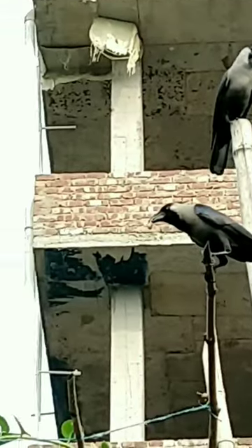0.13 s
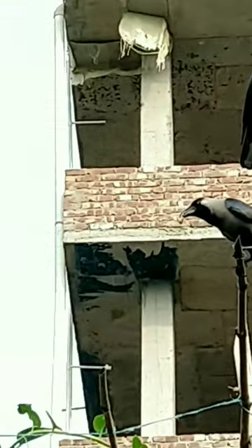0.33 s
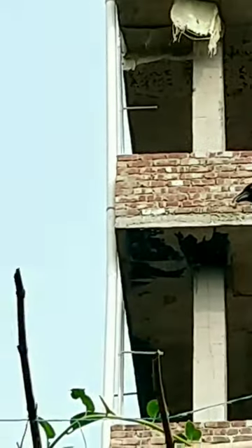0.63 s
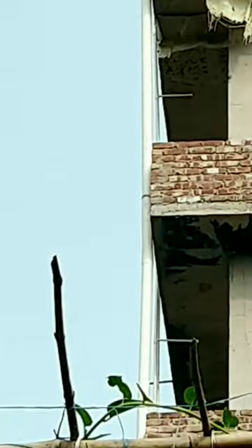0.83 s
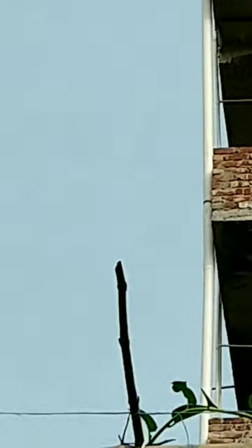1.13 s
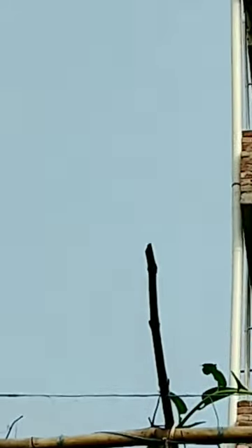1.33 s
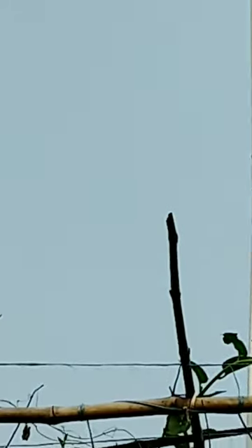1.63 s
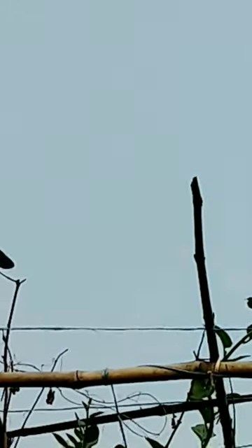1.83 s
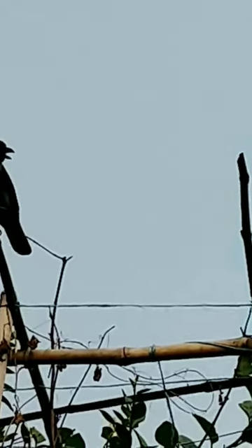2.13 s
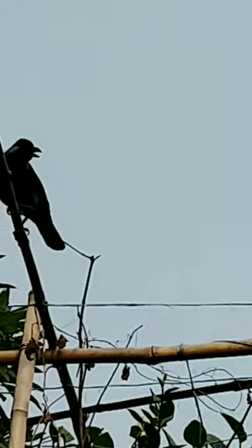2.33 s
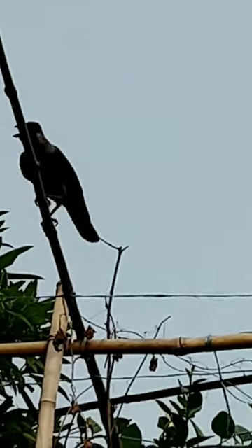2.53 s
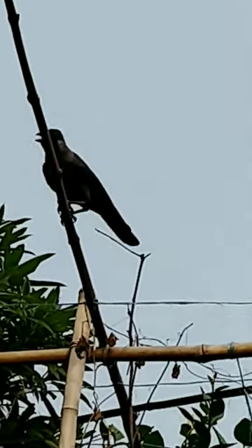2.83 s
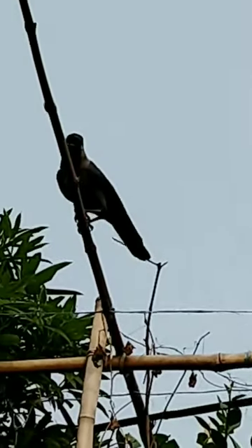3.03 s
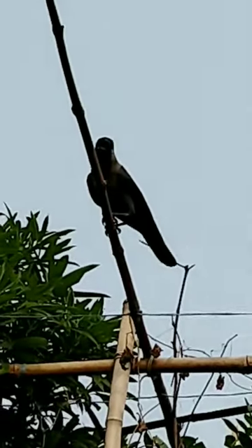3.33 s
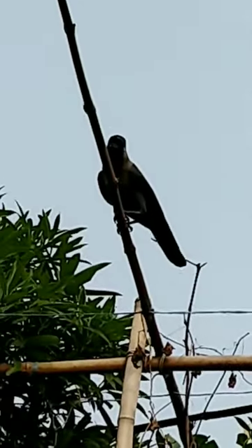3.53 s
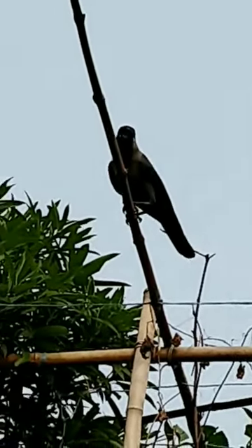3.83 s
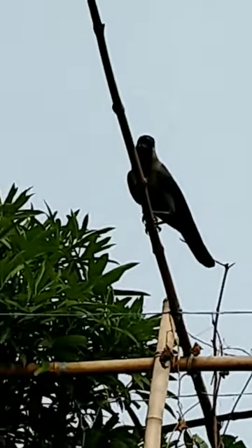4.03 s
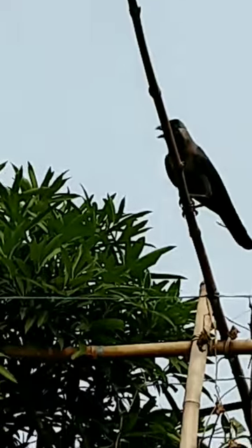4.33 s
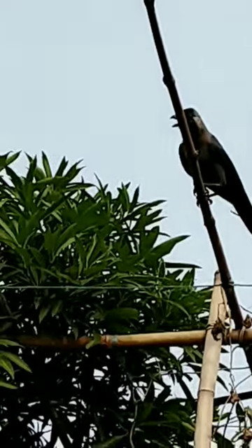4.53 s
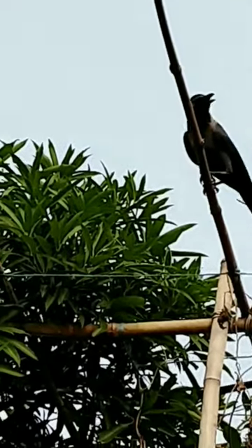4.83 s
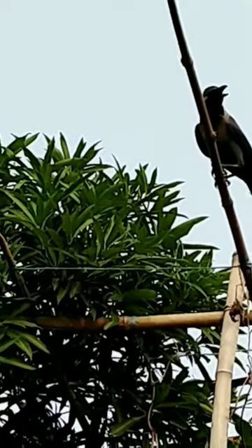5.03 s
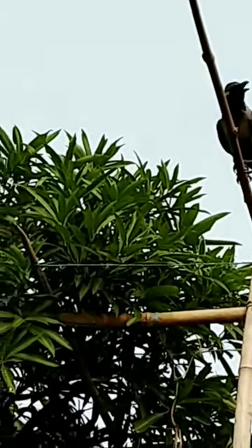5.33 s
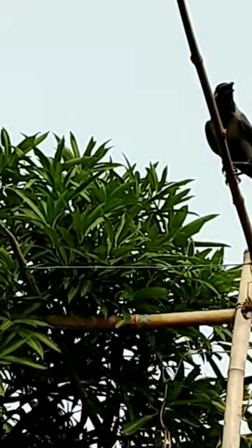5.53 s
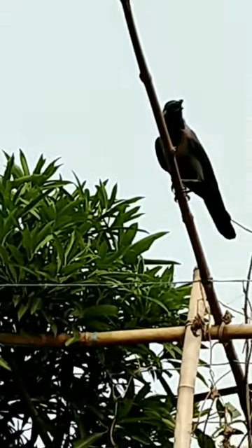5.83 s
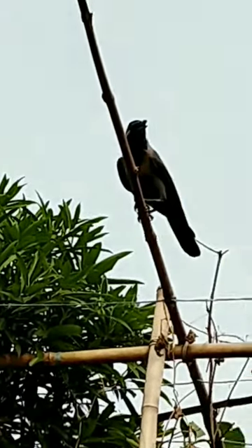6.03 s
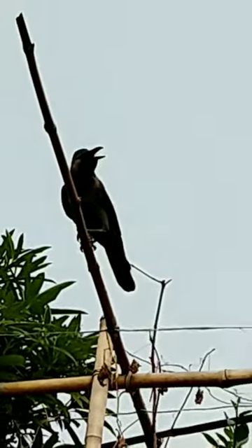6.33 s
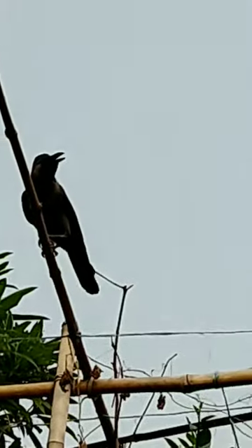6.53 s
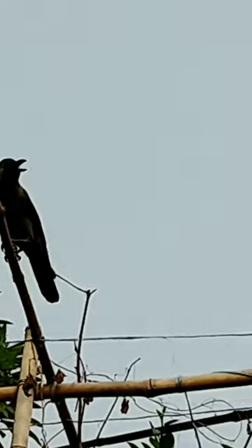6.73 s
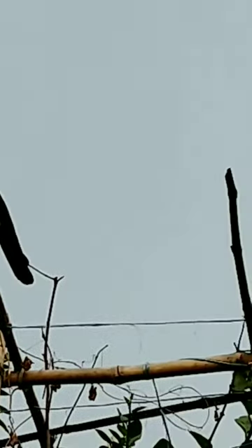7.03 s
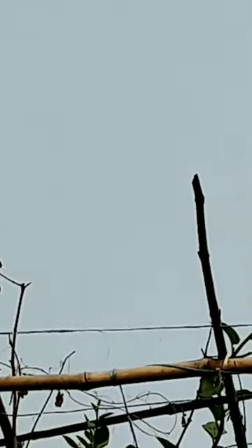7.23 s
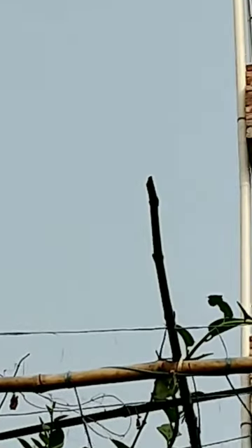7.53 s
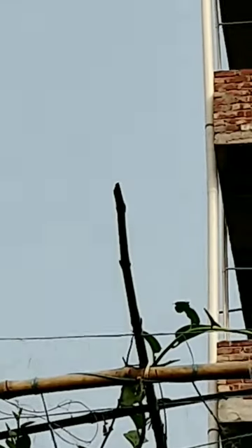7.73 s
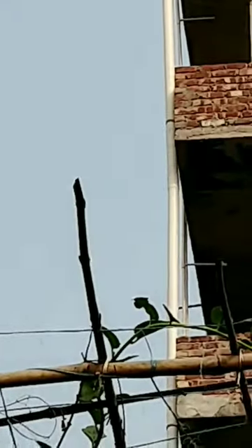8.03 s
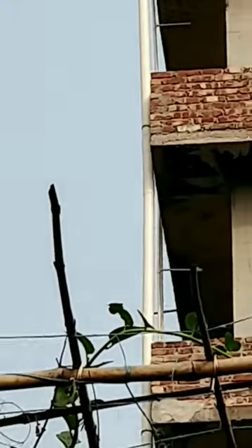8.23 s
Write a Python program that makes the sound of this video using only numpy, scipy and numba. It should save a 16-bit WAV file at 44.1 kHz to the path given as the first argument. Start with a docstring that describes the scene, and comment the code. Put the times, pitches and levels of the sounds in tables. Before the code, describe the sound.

A low, steady town murmur with faint hiss opens the scene, its upper part filling in over the first second. A barely audible caw at 0.2 s and small distant sparrow notes and faint whistles lead to 1.4 s, when a near crow begins: five hoarse, nasal caws, each about 0.3 s, at 1.4, 1.9, 2.5, 3.0 and 3.6 s. A sparrow chirps at 1.85 s, and broom-like swishes brush past around 2.3, 3.6 and 4.2 s. A weaker caw comes at 4.4 s, a chirp at 4.9 s, then from 5.0 to 7.4 s caws of uneven strength overlap, with another swish near 6 s and traffic swelling softly around 7.3 s. Strong caws at 7.6 and 8.1 s close it. The calls lean slightly left, with dense short echoes and a bright tail from concrete.

```python
"""A far town murmur, a faint caw and far sparrow notes come first; then a near house crow caws in two runs, others between.
The crows sit on bamboo poles by a bare concrete building: fluttering pulse tones ring through a throat, with breath noise.
Sparrows chirp in bending near sines, and strokes of broad noise swish now and then like a broom.
Walls throw the near sounds back as dense echoes; shaped noise makes the town's rumble and hiss, heard on two microphones."""
import sys
import numpy as np
from scipy import signal
from scipy.fft import rfft, irfft, next_fast_len
from scipy.io import wavfile
from scipy.ndimage import uniform_filter1d
from numba import njit

SR = 44100
rng = np.random.default_rng(int(sys.argv[2]) if len(sys.argv) > 2 else 0)


def unload_audio(sound):
    """Save the sound as a 16-bit wav file, at the path given as the first command line argument."""
    columns = np.transpose(np.atleast_2d(sound))
    # keep every value between -1 and 1, then stretch to whole-number steps
    steps = np.round(np.clip(columns, -1, 1) * 32767)
    wavfile.write(sys.argv[1], SR, steps.astype(np.int16))


N = 369558

# All levels are before the final mix; spectra give only colour, as their noise is scaled to rms 1.
# Crow caws: start_s, length_s, level_db, top_moment [0-1], top_pitch_hz, end_sag_hz, mean_flutter_hz,
# whole_share [tone left whole by the flutter, 0-1], breath_db [over the tone], left_right_db
CAWS = [(0.189, 0.3, -53, 0.5, 967, 207, 70.7, 0.14, -0.5, 3),
        (1.396, 0.29, -27, 0.47, 940, 385, 71.9, 0.07, -6, 2.5),
        (1.935, 0.28, -27, 0.53, 938, 448, 71, 0.1, -5.5, 3.5),
        (2.478, 0.3, -27, 0.49, 942.7, 407, 70.7, 0.13, -8, 3.5),
        (3.035, 0.29, -26, 0.41, 964, 467, 73.26, 0.08, -6.5, 1.5),
        (3.593, 0.31, -25.5, 0.45, 961, 399, 71.5, 0.15, -8.5, 2.5),
        (4.386, 0.32, -32.5, 0.38, 968.5, 350, 69.76, 0.07, -5.5, 0.5),
        (5.041, 0.37, -28, 0.36, 948, 276, 72.64, 0.05, -4, 2.5),
        (5.42, 0.32, -30, 0.29, 978, 209, 71.7, 0.5, -10, 0),
        (5.58, 0.31, -29, 0.43, 940, 310, 72.1, 0.08, -7, 2),
        (5.807, 0.27, -33, 0.19, 973, 248, 69.9, 0.23, -7.5, 1),
        (6.033, 0.25, -32.5, 0.25, 1002, 216, 71.3, 0.22, -19, 0.5),
        (6.144, 0.3, -31, 0.31, 966, 456, 71.3, 0.08, -5, 2),
        (6.413, 0.33, -32.5, 0.24, 956, 299.4, 71.2, 0.18, -8.5, 2.5),
        (6.638, .28, -29, 0.4, 973.5, 319, 71.7, 0.1, -5.5, 3.5),
        (6.844, 0.27, -34.5, 0.28, 988, 243, 71.2, 0.23, -11, 0),
        (7.071, 0.25, -31.5, 0.28, 943, 150, 71.1, 0.1, -7, 3),
        (7.157, 0.28, -27, 0.45, 962.5, 390, 72.8, 0.02, -7.5, 4),
        (7.616, 0.29, -25.5, 0.33, 987, 392, 71.2, 0.14, -7, 3.5),
        (7.933, 0.28, -54, 0.3, 1037, 140, 71, 0.4, -11, 4),
        (8.074, .3, -25, 0.45, 986, 401, 71.8, 0.05, -6.5, 4.5)]
# Resonances of the crow's throat: centre_hz [at the top pitch], width_hz [of each of two passes], relative_level_db
THROAT_RINGS = [(730, 1100, -16), (1195, 467, -4.5), (1496, 950, -5.5), (1921, 290, 9.5), (2090, 376, -1),
                (2556, 76, -10.5)]
# Colour of the crow's breath: frequency_hz, relative_db_per_hz
BREATH_COLOUR = [(1590, -50), (2700, -42), (2980, -8.5), (3710, -10), (4580, 0.5), (5530, -2.5), (6880, -8),
                 (9850, 5), (12300, -9), (14000, -19.5), (14700, -36)]
# Near sparrow notes: start_s, length_s, level_db, first_pitch_hz, middle_pitch_hz, last_pitch_hz
CHIRPS = [(1.836, .036, -52, 4700, 5400, 6200), (1.862, .095, -40, 3100, 4750, 3700),
          (4.868, .04, -49, 3800, 4500, 5600), (4.9, .125, -41, 2650, 4550, 3600)]
# Notes of farther sparrows, heard mostly off the walls: same columns as CHIRPS
FAR_CHIRPS = [(-.02, 0.085, -55.5, 5130, 4760, 4070), (.32, 0.03, -54.5, 4320, 4770, 4580),
              (.62, 0.17, -62, 5750, 5280, 5220), (.755, 0.11, -53, 3220, 4670, 3770),
              (1.055, 0.088, -65, 5400, 5800, 7000), (1.145, 0.055, -50, 7060, 4870, 3360),
              (4.35, 0.058, -45.5, 3380, 4610, 4720)]
# Faint far whistles: same columns as CHIRPS
WHISTLES = [(-.1, 0.39, -60, 2550, 2524, 2660), (.5, 0.75, -55.5, 1220, 1110, 1060),
            (.95, 0.265, -60.5, 1110, 1065, 1050), (1.03, 0.35, -56, 940, 944, 934)]
# Short low hums far off: same columns as CHIRPS
HUMS = [(.88, 0.13, -47.5, 431, 440, 440), (1.05, 0.17, -46, 339, 340, 334),
        (2.36, 0.1, -47.5, 368, 345, 335), (3.44, 0.12, -42.5, 289, 325, 417),
        (7.3, 0.29, -53, 381, 385, 393), (7.36, 0.32, -50, 288.3, 292, 293.5),
        (7.3, 0.31, -66, 193, 200, 196)]
# Broom-like swishes: start_s, length_s, level_db
SWISHES = [(.2, 0.56, -81), (2.19, 0.36, -39.5), (2.75, 0.38, -49), (3.39, 0.78, -47.5),
           (4.05, 0.38, -39.5), (5.91, 0.41, -38.5), (7.88, 0.19, -56.5)]
# Colour of a swish: frequency_hz, relative_db_per_hz
SWISH_COLOUR = [(290, -38), (500, -8.5), (774, -4.5), (1800, -2.5), (3970, -12), (7500, -13.5), (9800, -10),
                (11500, -12), (13500, -24), (14700, -40)]
# Swells of traffic rumble: start_s, length_s, level_db
SWELLS = [(.85, 0.48, -79.5), (2.29, 0.27, -49), (3.4, 0.32, -61), (4.5, 2, -56), (6.85, 1.06, -46.5)]
# Colour of the traffic rumble: frequency_hz, relative_db_per_hz
TRAFFIC_COLOUR = [(47, -60), (80, -6.5), (275, -3), (324, -12.5), (374, -2.5), (421, -10.5), (700, -14.5),
                  (910, -5), (1540, -120)]
# Colour of the steady town murmur: frequency_hz, relative_db_per_hz
TOWN_COLOUR = [(12, -52), (20, -27.5), (97, 2), (230, 1.5), (374, 0), (596, -3.5), (910, -5), (1510, -8.5),
               (1810, -7.5), (2080, -13.5), (2260, -38), (2500, -32), (3250, -51), (5500, -120)]
# Colour of the far hiss: frequency_hz, relative_db_per_hz
AIR_COLOUR = [(1470, -47), (2500, -42), (4250, -35), (5450, -5), (6220, -13), (8480, -3), (9820, 19),
              (10800, 4.5), (11800, 9), (14500, -53)]
# Likeness of noise at the two microphones: frequency_hz, likeness [-1 to 1]
LIKENESS = [(30, .55), (100, .93), (300, .9), (700, .3), (2000, .3), (3500, -.2), (6000, -.5),
            (12000, -.55)]
# Left-right balance of noise: frequency_hz, left_right_db
LEAN = [(30, -1.5), (200, -1.5), (700, -1.5), (2000, 3), (5000, -2.5), (12000, 0)]

# Caw: sets in fast, swells a little, dies
CAW_LOUDEST, CAW_RISE_DB, CAW_RISE_STEEP, CAW_FALL_DB, CAW_FALL_STEEP = .6, 27, 4, 27, 2.5
START_SAG_HZ = 200.44  # the pitch starts this far under its top
RING_FOLLOWS = 0.17  # share of the pitch's sag that the throat's rings follow
LOUD_DB, LOW_DB, LOW_PER_DB = -27, 0.5, 0.49  # low rings' gain in a caw at LOUD_DB; more per dB fainter
OVERTONES_DB, OVERTONE_TILT_DB = -20.5, 0.5  # partials added past the throat; change per partial
RING_LEAN_DB = 4  # the left microphone favours the throat's main ring
# Note: swells and dies; its bend comes a little early and peaks
NOTE_TOP, NOTE_RISE_DB, NOTE_FALL_DB, NOTE_FADE_S = .42, 13, 14, .01
NOTE_HURRY, NOTE_PEAKED = .9, 1.5  # exponents
SWISH_TOP, SWISH_RISE_DB, SWISH_FALL_DB = 0.35, 13, 13.5
SWELL_END_DB = 16  # fall from a swell's top to either end
TRAFFIC_DB, TRAFFIC_DB_PER_S = -62.5, 1.18  # the rumble under the swells grows slowly
TOWN_DB, AIR_DB = -51, -57
TOWN_DIP_DB, TOWN_DIP_S, TOWN_SPLIT_HZ = 10.5, 1, 470  # the upper murmur starts low and fills in
CUTOFF_HZ = 15000


def crows(half_db, swing):
    """Syrinx pulses, strong and weak in turn, shaken by a slow flutter, through the throat; breath hisses along."""
    wander_hz, rough_db, grit, pitch_steep, fade_s = 8, -2.5, .4, 2.8, .015
    slip = .6  # radians by which the flutter's turns slip about
    lag = 3  # samples
    tone, breath, hoarse = np.zeros((2, N)), np.zeros(N), drift(111)
    wander, unsteady, rasp = drift(48.2), drift(6.1), rng.standard_normal(N)
    for (start_s, length_s, level_db, top, top_hz, fall_hz,
         flutter_hz, whole, breath_db, pan_db) in CAWS:
        at, along, fade = span(start_s, length_s, fade_s)
        rise_db = arch(along, CAW_LOUDEST, CAW_RISE_DB, 0, CAW_RISE_STEEP)
        fall_db = arch(along, CAW_LOUDEST, 0, CAW_FALL_DB, CAW_FALL_STEEP)
        gain = fade * amp(level_db + rise_db + fall_db)
        hz = top_hz + arch(along, top, START_SAG_HZ, fall_hz, pitch_steep)
        flutter = 2 * np.pi * np.cumsum(flutter_hz * (1 + 0.023 * unsteady[at])) / SR

        # the flutter bends the pitch and turns the upper tone over twice a turn:
        # the upper partials split into lines a flutter apart
        phase = 2 * np.pi * np.cumsum(hz + wander_hz * wander[at]) / SR + swing * np.sin(flutter)
        upper = sum(np.cos((k + 1) * phase) + amp(half_db) * np.cos((k + .5) * phase) for k in (1, 2))
        lowest = np.cos(phase) * (1 + 1.36 * np.sin(flutter) + grit * hoarse[at])
        turning = whole + np.cos(flutter + slip * wander[at])
        source = lowest + upper * turning + amp(rough_db) * rasp[at]

        sink = 1 + RING_FOLLOWS * (hz / top_hz - 1)  # the beak closes as the pitch sags
        rings = [(-1) ** k * amp(ring_db) * resonance(source, ring_hz * sink, width_hz)
                 for k, (ring_hz, width_hz, ring_db) in enumerate(THROAT_RINGS)]
        fainter_db = np.clip(LOUD_DB - level_db, -3, 9)
        low = amp(LOW_DB + LOW_PER_DB * fainter_db) * sum(rings[:2])
        high = sum(rings[2:])
        # the high rings' own swings are evened out before the caw's swell is laid on
        even = gain / np.sqrt(uniform_filter1d(high ** 2, size=2600, mode="reflect") + 0.0027)
        # only the short waves are shadowed on the far side
        ring_lean = amp([[RING_LEAN_DB / 2], [-RING_LEAN_DB / 2]]) - 1
        pan = amp([[pan_db / 2], [-pan_db / 2]])
        tone[:, at] += even * (low + (high + rings[3] * ring_lean) * pan)

        overtones = sum(amp(OVERTONE_TILT_DB * k) * np.cos((k + 5) * phase) for k in range(4))
        tone[:, at] += gain * amp(OVERTONES_DB) * np.cos(flutter) * overtones
        puffs = 1 + 0.61 * np.cos(2 * flutter)
        breath[at] += uniform_filter1d(gain, size=800) * amp(breath_db) * puffs
    # the sound bends round to the left microphone a little late
    tone[0] = np.concatenate([np.zeros(lag), tone[0, :-lag]])
    return tone + breath * patchy(noise(BREATH_COLOUR), patch_db=2.0, rate_hz=9.4)


def resonance(x, hz, width_hz):
    """A moving resonance passed twice, for steep skirts."""
    r = np.exp(-np.pi * width_hz / SR)
    shape = (1 - r * r) / 2, 2 * r * np.cos(2 * np.pi * hz / SR), r * r
    return ring_along(ring_along(x, *shape), *shape)


@njit
def ring_along(x, b0, a1, a2):
    """A two-pole resonance whose centre moves from sample to sample."""
    y = np.zeros(len(x))
    for i in range(2, len(x)):
        y[i] = b0 * (x[i] - x[i - 2]) + a1[i] * y[i - 1] - a2 * y[i - 2]
    return y


def notes(rows, warble_hz, burr, rate_hz, octave_db):
    """Near sines with a weak octave, bending through three pitches; pitch and level tremble."""
    out, tremble, shake = np.zeros(N), drift(rate_hz), drift(rate_hz)
    for start_s, length_s, level_db, first_hz, middle_hz, last_hz in rows:
        at, along, fade = span(start_s, length_s, NOTE_FADE_S)
        gain = fade * amp(level_db + arch(along, NOTE_TOP, NOTE_RISE_DB, NOTE_FALL_DB, steep=2.6))
        bend = np.abs(along) ** NOTE_HURRY
        bulge_hz = (2 * middle_hz - first_hz - last_hz) / 2
        bulge = np.sin(np.pi * np.clip(bend, 0, 1)) ** NOTE_PEAKED
        hz = first_hz + (last_hz - first_hz) * bend + bulge_hz * bulge
        phase = 2 * np.pi * np.cumsum(hz + warble_hz * tremble[at]) / SR
        voice = np.sin(phase) + amp(octave_db) * np.sin(2 * phase)
        out[at] += gain * (1 + burr * shake[at]) * voice
    return out


def swishes():
    """Short strokes of broad, slightly grainy noise."""
    grain = amp(1.4 * drift(41))
    return strokes(SWISHES, SWISH_TOP, SWISH_RISE_DB, SWISH_FALL_DB) * grain * noise(SWISH_COLOUR)


def strokes(rows, top, rise_db, fall_db):
    """Gain of a run of swells."""
    out = np.zeros(N)
    for start_s, length_s, level_db in rows:
        at, along, fade = span(start_s, length_s, fade_s=0.043)
        out[at] += fade * amp(level_db + arch(along, top, rise_db, fall_db, steep=1.03))
    return out


def diffuse(x, gain):
    """Close surfaces smear a sound over some thousandths of a second without colouring it, each side differently."""
    size = next_fast_len(N + SR // 2)
    turn = 2 * np.pi * np.arange(size // 2 + 1) / size
    through = rfft(x, size)
    # three all-pass stages; lags in samples, one for each side
    for lag in rng.uniform([[15], [45], [100]], [[35], [80], [160]], (3, 2)).round():
        late = np.exp(-1j * turn * lag[:, None])
        through = through * (gain + late) / (1 + gain * late)
    return irfft(through, size)[:, :N]


def walls(x, near_db, near_s, far_db, far_s):
    """A quick cluster from close by and a long tail from the building."""
    return scatter(x, near_db, near_s) + scatter(x, far_db, far_s)


def scatter(x, level_db, t60_s):
    """Dense echoes that die away, other ones on each side."""
    t = np.arange(SR) / SR
    echoes = rng.standard_normal((2, SR)) * (t > .002) * amp(-60 * t / t60_s)
    response = amp(level_db) * rms_one(echoes) / np.sqrt(SR)
    return signal.fftconvolve(x, response, axes=1)[:, :N]


def town():
    """A steady murmur, swells of traffic rumble and a thin hiss, each of shaped noise."""
    t = np.arange(N) / SR
    rumble = amp(TRAFFIC_DB + TRAFFIC_DB_PER_S * t) + strokes(SWELLS, 0.51, SWELL_END_DB, SWELL_END_DB)
    traffic = rumble * amp(2.97 * drift(6.9)) * noise(TRAFFIC_COLOUR)
    dip_db = TOWN_DIP_DB * np.clip(1 - t / TOWN_DIP_S, 0, 1)
    murmur = noise(TOWN_COLOUR)
    lower = signal.sosfilt(signal.butter(1, TOWN_SPLIT_HZ, fs=SR, output="sos"), murmur)
    murmur = lower + amp(-dip_db) * (murmur - lower)
    hiss = patchy(noise(AIR_COLOUR), patch_db=4.0, rate_hz=2.9)
    return amp(TOWN_DB) * murmur + traffic + amp(AIR_DB) * hiss


def noise(spectrum):
    """Stereo noise of a given colour, with the microphones' likeness and lean; rms 1."""
    size = next_fast_len(N)
    hz = np.maximum(np.arange(size // 2 + 1) * SR / size, 1)
    mid, side = rfft(rng.standard_normal((2, size)))
    alike = np.clip(at_hz(LIKENESS, hz), -1, 1)
    lean = amp(at_hz(LEAN, hz) / 2)
    mid, side = mid * np.sqrt(1 + alike), side * np.sqrt(1 - alike)
    pair = [(mid + side) * lean, (mid - side) / lean]
    return rms_one(irfft(amp(at_hz(spectrum, hz)) * pair, size)[:, :N])


def patchy(x, patch_db, rate_hz):
    """Keeps the treble in third-octave bands, each flickering on its own."""
    edges = 2300 * 2 ** (np.arange(9) / 3)
    return sum(amp(patch_db * drift(rate_hz))
               * signal.sosfilt(signal.butter(2, pair, "band", fs=SR, output="sos"), x)
               for pair in zip(edges, edges[1:]))


def drift(rate_hz):
    """Slow chance: noise through a two-pole low-pass, spread 1."""
    r = np.exp(-2 * np.pi * rate_hz / SR)
    # a second of run-in is dropped
    return rms_one(signal.lfilter([1], [1, -2 * r, r * r], rng.standard_normal(N + SR))[SR:])


def arch(along, top, rise, fall, steep):
    """Zero at the top, rise lower at the start, fall lower at the end."""
    top = np.clip(top, .1, .9)
    before = np.maximum(1 - along / top, 0)
    after = np.maximum((along - top) / (1 - top), 0)
    return -rise * before ** steep - fall * after ** steep


def span(start_s, length_s, fade_s):
    """Sample slice of a sound, the progress through it (0-1) and a fade for its ends."""
    at = slice(max(round(start_s * SR), 0), min(round((start_s + length_s) * SR), N))
    along = (np.arange(at.start, at.stop) / SR - start_s) / length_s
    to_end_s = np.minimum(along, 1 - along) * length_s
    return at, along, np.sin(np.pi / 2 * np.clip(to_end_s / fade_s, 0, 1))


def amp(db):
    """Gain of a level in dB."""
    return 10 ** (np.asarray(db) / 20)


def rms_one(x):
    """Scaled to rms 1."""
    return x / np.sqrt(np.mean(x ** 2) + 1e-20)


def at_hz(points, hz):
    """A spectrum table read on a log-frequency axis."""
    table = np.array(points)
    return np.interp(np.log(hz), np.log(np.maximum(table[:, 0], 1)), table[:, 1])


def scene():
    """Birds, hums and swishes with their echoes, over the town."""
    near = crows(half_db=-5.0, swing=0.4)
    near = near + notes(CHIRPS, warble_hz=130, burr=.7, rate_hz=500, octave_db=-30)
    near = near + notes(WHISTLES, warble_hz=22.3, burr=0.33, rate_hz=28.4, octave_db=-60)
    near = near + swishes()
    near = near + notes(HUMS, warble_hz=10.5, burr=0.8, rate_hz=17, octave_db=-23)
    far = notes(FAR_CHIRPS, warble_hz=161, burr=0.5, rate_hz=510, octave_db=-19.0) * np.ones((2, 1))

    echoes = walls(near, near_db=-9, near_s=.1, far_db=-17.5, far_s=1.0)
    echoes = echoes + walls(far, near_db=-5.0, near_s=0.46, far_db=3.0, far_s=0.75)
    # hard concrete scatters short waves well: the treble has a fuller tail
    treble = signal.sosfilt(signal.butter(4, 2600, "high", fs=SR, output="sos"), near)
    echoes = echoes + scatter(treble, level_db=-12, t60_s=0.65)
    direct = amp(2.0) * diffuse(near, gain=.6) + amp(-9) * far
    return direct + echoes + town()


def record(dry):
    """The top is cut by a steep low-pass."""
    return signal.sosfilt(signal.cheby2(16, 70, CUTOFF_HZ, fs=SR, output="sos"), dry)


dry = scene()
out = record(dry)
unload_audio(out)
```